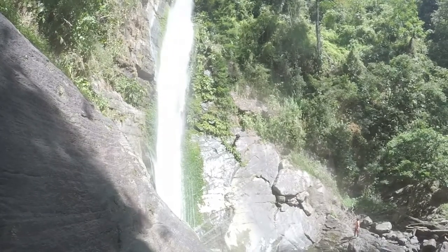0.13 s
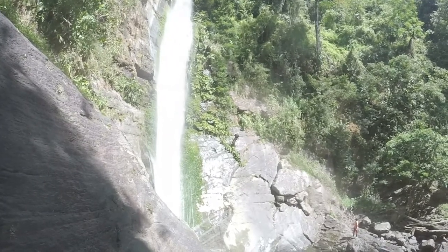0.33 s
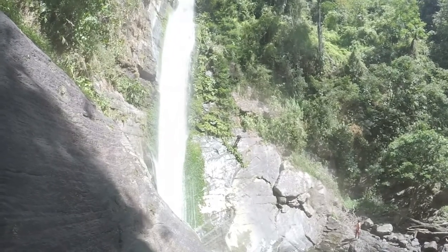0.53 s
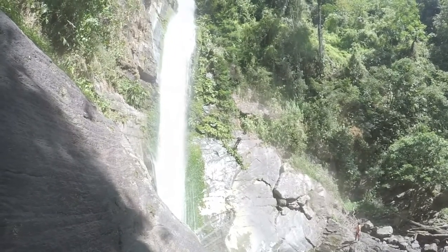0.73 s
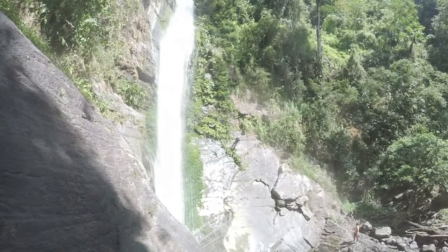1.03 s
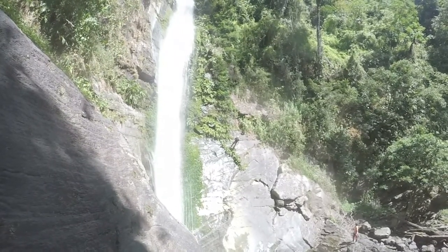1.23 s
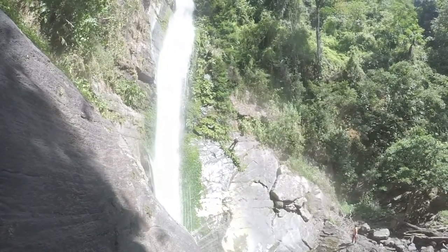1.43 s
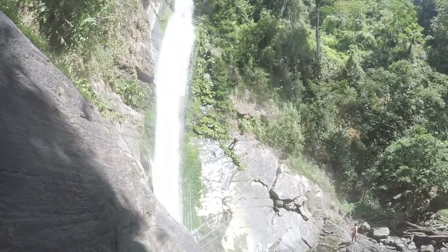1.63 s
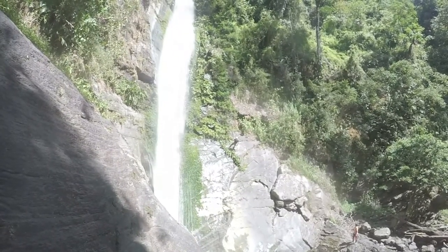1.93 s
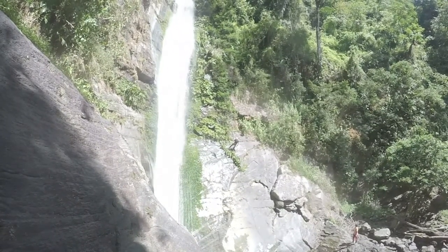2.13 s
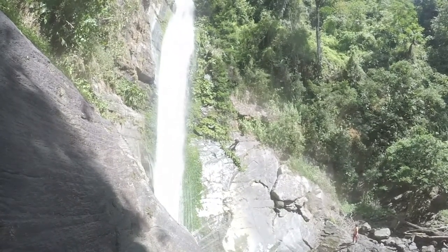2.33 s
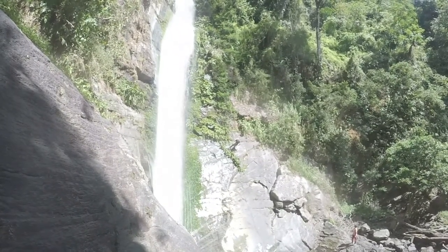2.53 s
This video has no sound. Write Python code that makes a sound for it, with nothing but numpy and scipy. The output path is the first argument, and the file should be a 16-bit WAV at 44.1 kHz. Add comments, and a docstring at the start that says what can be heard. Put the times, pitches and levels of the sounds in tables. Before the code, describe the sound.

A large waterfall rushes steadily down a rock cliff while wind rumbles on the microphone

```python
"""Waterfall from some way off

A large waterfall drops down a rock cliff, heard on a small, almost mono microphone.
The water is a smooth hiss of fine noise and dense splash clicks, over the low noise of the plunge pool.
The draught from the fall buffets the microphone with deep noise, and the bass flattens at its peaks.
Short puffs of air are brief swells of narrow noise; a faint top hiss differs from left to right."""
import sys
import numpy as np
from scipy import signal
from scipy.fft import rfft, irfft, next_fast_len
from scipy.io import wavfile
from scipy.ndimage import uniform_filter1d, map_coordinates

SR = 44100
rng = np.random.default_rng(int(sys.argv[2]) if len(sys.argv) > 2 else 0)


def bounce(signal):
    """Save signal as a 16-bit WAV file at the path given by the first command-line argument."""
    frames = np.transpose(np.atleast_2d(signal))
    limited = np.clip(frames, -1, 1)
    pcm = np.round(limited * 32767).astype(np.int16)
    wavfile.write(sys.argv[1], SR, pcm)


N = 118188  # length in samples


def amp(db):
    """Turn decibels into a gain."""
    return 10 ** (np.asarray(db) / 20)


def unit(x):
    """Scale a sound to an average strength (rms) of 1."""
    return x / np.sqrt(np.mean(x ** 2) + 1e-20)


def curve(rows):
    """Join (time in s, value) rows with straight lines, one value per sample."""
    return np.interp(np.arange(N) / SR, *np.transpose(rows))


def filtered(x, response):
    """Multiply each frequency in x by the gain that response gives for it."""
    padded = next_fast_len(N + 8192)  # spare room, so that the end does not wrap onto the start
    hz = np.fft.rfftfreq(padded, 1 / SR)
    return irfft(rfft(x, padded) * response(hz), padded)[..., :N]


def coloured(x, spectrum):
    """Shape x with (Hz, relative dB) rows, joined on a log pitch scale, then scale it to rms 1."""
    pitch_hz, level_db = np.transpose(spectrum)
    knots = np.log(pitch_hz + 1)
    return unit(filtered(x, lambda hz: amp(np.interp(np.log(hz + 1), knots, level_db))))


def wobble(rate):
    """Draw a smooth random curve through `rate` random points a second."""
    points = rng.standard_normal(int(N * rate / SR) + 4)
    return map_coordinates(points, [np.arange(N) * rate / SR])


def patchy(patch_db):
    """Make white noise with random louder and softer patches in time and pitch."""
    grid = signal.stft(rng.standard_normal(N + 512), nperseg=512)[2]
    field = rng.standard_normal(grid.shape)
    for axis in (0, 1):  # smooth over pitch, then over time
        field = uniform_filter1d(field, size=8, axis=axis)
    noise = signal.istft(grid * amp(patch_db * unit(field)), nperseg=512)[1]
    return unit(noise[:N])


def puffs():
    """Short puffs of air on the microphone: each is a brief swell of narrow noise."""
    # start_s is the loudest moment and level_db the level there; width is the half width of the
    # band in natural-log pitch; half_s is the time from the peak until the swell falls to 1/e.
    # columns: start_s, level_db, pitch_hz, width (no unit), half_s
    puff_rows = [(.2, -49, 270, 0.18, .03), (.83, -38.5, 330, 0.49, .012), (1.13, -37, 290, 0.23, .035),
                 (1.45, -49, 320, .3, .025), (1.81, -37.5, 350, 0.28, 0.022), (2.373, -39, 450, .3, .022),
                 (2.41, -35.5, 310, 0.21, .015)]
    t = np.arange(N) / SR
    out = np.zeros(N)
    for start_s, level_db, pitch_hz, width, half_s in puff_rows:
        noise = rng.standard_normal(N)
        band = filtered(noise, lambda hz: np.exp(-(np.log((hz + 1) / pitch_hz) / width) ** 2))
        swell = np.exp(-((t - start_s) / half_s) ** 2)
        out += amp(level_db) * unit(band) * swell
    return out


def top_hiss(water):
    """Faint high hiss that differs between the sides: fresh noise plus the top of the spray."""
    # colour of the fresh noise: pitch_hz, level_db (relative, per Hz)
    hiss_colour = [(11000, -90), (11700, -14), (12000, -2), (12600, 0), (15200, -9)]
    level_db, spray_share = -54.5, 0.18  # the share is of power
    fresh = coloured(rng.standard_normal(N), hiss_colour)
    spray_top = unit(filtered(water, lambda hz: hz > 11800))
    return amp(level_db) * (np.sqrt(1 - spray_share) * fresh + np.sqrt(spray_share) * spray_top)


def pool_boom():
    """Boom of the plunge pool: low noise whose level drifts and wobbles."""
    # level over time: start_s, level_db
    boom_level = [(0, -16), (.2, -19), (.4, -17.5), (.6, -19.5), (.75, -18), (.88, -22), (1.0, -17.5),
                  (1.4, -18), (1.9, -18.5), (2.2, -17), (2.42, -21), (2.68, -16.5)]
    # colour of the boom: pitch_hz, level_db (relative, per Hz)
    boom_colour = [(30, -12), (70, -10.5), (110, 1), (160, -1.5), (200, -12), (250, -18), (300, -30.5),
                   (350, -24), (420, -48), (900, -120)]
    level_db = curve(boom_level) + 0.67 * wobble(9)
    return amp(level_db) * coloured(rng.standard_normal(N), boom_colour)


def buffeting():
    """Draught on the microphone: deep noise that swells with each push of air."""
    # level over time: start_s, level_db
    push_level = [(0, -12), (.1, -22), (.25, -18), (.55, -22), (.7, -10.5), (.85, -9.5), (1.0, -16),
                  (1.15, -15.5), (1.3, -15), (1.45, -12), (1.6, -17), (1.8, -9), (1.93, -16), (2.08, -11.5),
                  (2.2, -21), (2.4, -8), (2.55, -13), (2.68, -11.5)]
    # colour of the buffeting: pitch_hz, level_db (relative, per Hz)
    push_colour = [(3, -6), (8, -5), (30, 0.5), (55, -2.5), (85, -7), (130, -23.5), (250, -55), (600, -120)]
    level_db = curve(push_level) + 0.36 * wobble(6.9)
    return amp(level_db) * coloured(rng.standard_normal(N), push_colour)


def bass():
    """Boom and buffeting together, with rounded-off peaks and the treble taken away."""
    top, knee = 0.6, 3.26  # limit the peaks bend towards (1 = full scale); higher knee bends sharper
    x = pool_boom() + buffeting()
    flat = x / (1 + np.abs(x / top) ** knee) ** (1 / knee)
    return filtered(flat, lambda hz: 1 / np.sqrt(1 + (hz / 260) ** 6))  # half power at 260 Hz


def spray():
    """Falling water: patchy hiss plus dense random splash clicks, in the colour of the fall."""
    # level over time: start_s, level_db
    flow_level = [(0.0, -28.5), (2.68, -28.5)]
    # colour of the water: pitch_hz, level_db (relative, per Hz)
    water_colour = [(250, -23), (400, -14), (453, -13.5), (602, -6), (699, -7), (1110, -4.5), (1300, -4),
                    (1740, -1), (2000, -3), (2400, -3), (2700, -5.5), (3520, -7), (4540, -3.5), (5120, -4),
                    (5950, -5.5), (7450, -16), (9610, -20), (11300, -30), (13000, -26.5), (15100, -32.5)]
    splashes_per_s, splash_share = 6000, 0.028  # the share is of power
    splash_boost_db = 3  # average random boost of a click
    hits = rng.random(N) < splashes_per_s / SR
    boost = amp(splash_boost_db * rng.exponential(size=N))
    clicks = hits * boost * rng.standard_normal(N)
    mix = np.sqrt(1 - splash_share) * patchy(patch_db=.5) + np.sqrt(splash_share) * unit(clicks)
    level_db = curve(flow_level) + 0.39 * wobble(6.08)
    return amp(level_db) * coloured(mix, water_colour)


def scene():
    """Put everything in the middle; only the top hiss is added left and subtracted right."""
    water = spray()
    side = top_hiss(water)
    mid = water + bass() + puffs()
    return np.array([mid + side, mid - side])


def record(dry):
    """Keep only what lies below the microphone's band limit."""
    return filtered(dry, lambda hz: hz < 15300)  # Hz


dry = scene()
out = record(dry)
bounce(out)
```